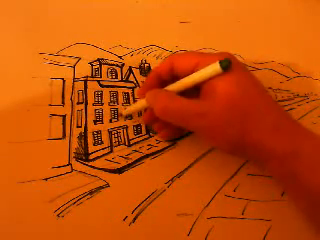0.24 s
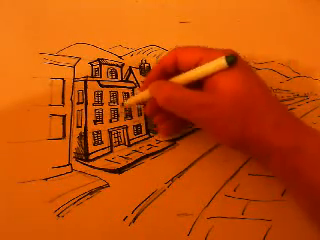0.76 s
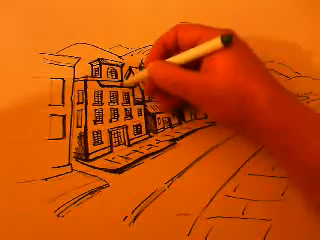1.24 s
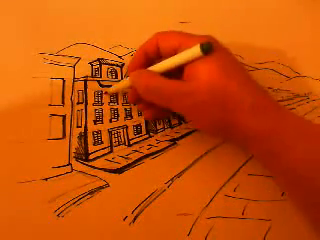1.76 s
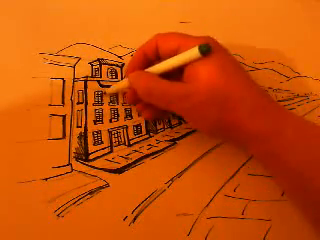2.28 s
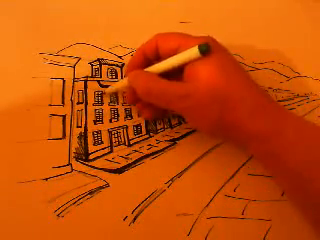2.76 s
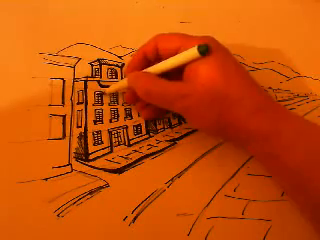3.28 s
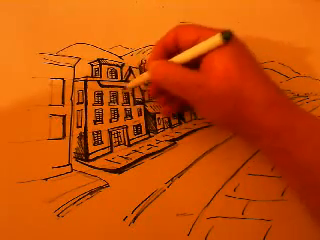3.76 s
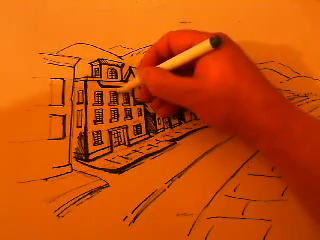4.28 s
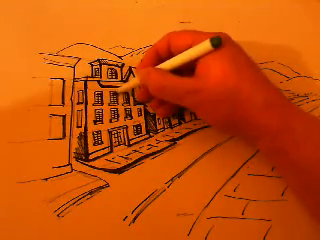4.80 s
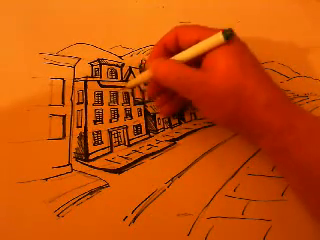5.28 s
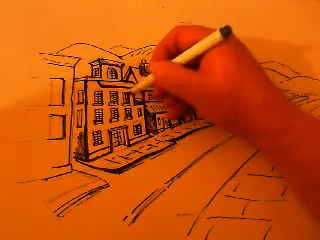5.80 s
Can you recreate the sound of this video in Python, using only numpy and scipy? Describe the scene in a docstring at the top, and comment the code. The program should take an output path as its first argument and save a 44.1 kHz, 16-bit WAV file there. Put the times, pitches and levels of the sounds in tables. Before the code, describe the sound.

A quiet small room, heard through a close microphone: steady soft air hiss, faint low fan hum wavering slightly, and a thin, very high electronic whine with rapid tiny interruptions. From 0.1 to 1.8 s a felt-tip pen skims paper in faint, airy strokes, with tiny high squeaks near 0.4, 0.6 and 0.85 s and a longer drag around 1 s. Clearer, brighter swishes come at 2.1, 2.45 and 2.7 s. From 3.05 to 3.6 s four firmer strokes land with rasp and dull desk thuds, followed by a light swish at 3.7 s. After a lull with one soft bump at 4.1 s, a quick run of short, scratchy dabs fills 4.4 to 5.25 s, including sharp, cracking taps at about 4.86 and 5.1 s. Background alone follows until two gently landed, juddering rasps at 5.83 and 5.92 s.

```python
"""A felt-tip pen hisses and rasps over paper on a desk in a small quiet room, with soft thuds and two sharp taps.
Light strokes are mostly friction noise; pressed ones also excite pen, sheet and desk resonances.
Stick-slip adds chirps and judder as narrow-band noise; impacts ring damped modes.
Behind: a faint fan (harmonics of its turning rate), air hiss (shaped noise), electronics (steady and gated sines)."""
import sys
import numpy as np
from scipy import signal
from scipy.fft import rfft, irfft
from scipy.io import wavfile
from scipy.ndimage import uniform_filter1d

SR = 44100
rng = np.random.default_rng(int(sys.argv[2]) if len(sys.argv) > 2 else 0)


def wav_out(sig):
    """Save sig, one row per channel (or a flat mono array), as 16-bit PCM at SR to the path in sys.argv[1]."""
    wavfile.write(sys.argv[1], SR, np.round(np.clip(np.atleast_2d(sig).T, -1, 1) * 32767).astype(np.int16))


N = 266364
T = np.arange(N) / SR

# desk resonances: (frequency [Hz], level [dB], t60 [s])
DESK_MODES = [(74.5, -53, 0.29), (152.4, -58, 0.23), (229, -54.5, .12), (258, -57.5, 0.11),
              (313, -64.5, 0.077), (390, -60, 0.051)]
# the tip lands and drags: (start [s], length [s], level [dB], landing force [dB], judder pitch [Hz], 0 = smooth)
PRESSED_STROKES = [ (3.049, .11, -75.5, -16, 1080), (3.239, 0.085, -72.5, -9.5, 0),
                   (3.374, .1, -69.5, -4, 0), (3.547, 0.075, -73, -7.5, 0),
                   (4.389, 0.065, -75.5, -16, 1120), (4.525, 0.072, -70.5, -6.5, 1110),
                   (4.704, 0.055, -73, -6.5, 0), (4.8574, .07, -69, .5, 0), (4.982, .065, -72.5, -7, 0),
                   (5.1026, 0.058, -71.5, 1, 0), (5.201, 0.048, -78.5, -7, 0),
                   (5.828, .07, -75, -10.5, 980), (5.924, .09, -70, -18, 1002)]


def from_db(db):
    """Decibels to gain."""
    return 10 ** (np.asarray(db) / 20)


def rms_one(x):
    """Scale to rms 1."""
    return x / np.sqrt(np.mean(x ** 2) + 1e-20)


def drift(knots_per_s):
    """Slow random curve, rms 1: straight lines between random knots."""
    knots = rng.standard_normal(int(N / SR * knots_per_s) + 2)
    return rms_one(np.interp(T * knots_per_s, np.arange(len(knots)), knots))


def coloured(x, spectrum):
    """Shape a steady sound's spectrum, interpolated over log frequency; rms 1."""
    hz, db = np.transpose(spectrum)
    bins_hz = np.maximum(np.fft.rfftfreq(N, 1 / SR), 1)
    gain_db = np.interp(np.log(bins_hz), np.log(hz), db)
    return rms_one(irfft(rfft(x) * from_db(gain_db), N))


def high_pass(x, hz):
    """Gentle first-order cut below hz."""
    return signal.sosfilt(signal.butter(1, hz, "high", fs=SR, output="sos"), x)


def resonate(x, hz, width_hz):
    """Two-pole resonance with about unit gain at its peak."""
    r = np.exp(-np.pi * width_hz / SR)
    zeros = np.array([1, 0, -1]) * (1 - r * r) / 2
    poles = [1, -2 * r * np.cos(2 * np.pi * hz / SR), r * r]
    return signal.lfilter(zeros, poles, x)


def ring(clicks, hz, t60_s):
    """Damped mode: a unit click starts a decaying sine of initial height about 1."""
    r = np.exp(-np.log(1000) / (t60_s * SR))
    w = 2 * np.pi * hz / SR
    return signal.lfilter([0, np.sin(w)], [1, -2 * r * np.cos(w), r * r], clicks + 1e-18)


def swell(start_s, end_s, power):
    """Gain over one movement as the tip speeds up and slows down; low power = flatter top."""
    shape = np.hanning(65) ** (power / 2)
    return np.interp(T, np.linspace(start_s, end_s, 65), shape, 0, 0)


def air(level_db=-67.5):
    """Steady broadband hiss, strongest in the bass."""
    # room air and microphone hiss: (frequency [Hz], density [dB per Hz, relative])
    floor = [(10, 18.5), (35, 17), (65, 17), (100, 11), (260, 9), (400, 5), (700, 2), (1100, 1.5),
             (2000, -2.5), (4000, -4), (9000, -5.5), (12500, -4), (15500, -2)]
    return from_db(level_db) * coloured(rng.standard_normal(N), floor)


def electronics(whine_hz=13500.3, whine_db=-69.5, frames_per_s=15, blank_share=0.11):
    """Steady tones, and a high whine that pauses briefly in every frame."""
    # steady tones: (frequency [Hz], level [dB rms])
    tones = [(3892, -96), (8000, -88), (8107, -97)]
    gate = 1. * (T * frames_per_s % 1 > blank_share)
    reading = uniform_filter1d(gate, size=16)  # soft edges
    whine = from_db(whine_db) * reading * np.sin(2 * np.pi * whine_hz * T)
    steady = sum(from_db(db) * np.sin(2 * np.pi * hz * T) for hz, db in tones)
    return np.sqrt(2) * (whine + steady)  # rms to peak


def fan(turns_per_s=30.52, wobble=.001, flutter_db=2.0):
    """Multiples of a slightly unsteady turning rate, each wavering in level."""
    # hum: (multiple of turning rate, level [dB rms before flutter])
    orders = [(4, -84.5), (5, -80.5), (6, -84.5), (7, -84), (8, -87.5), (10, -81), (14, -92), (28, -95.5)]
    turns = turns_per_s * np.cumsum(1 + wobble * drift(3)) / SR
    out = np.zeros(N)
    for k, db in orders:
        phase = 2 * np.pi * (round(k) * turns + rng.random())
        out += from_db(db + flutter_db * drift(5)) * np.sin(phase)
    return np.sqrt(2) * out  # rms to peak


def contacts(landing_hz=6100, hardening=3.02, thud_hz=260):
    """Contact pushes: the tip's brighten with force; the hand's stay dull."""
    # hand bumps the desk between strokes: (time [s], level [dB])
    thuds = [(3.127, -6.5), (3.480, -4.5), (4.131, -10), (4.627, -3.5)]
    # landing_hz is the corner of a 0 dB landing; it rises as force ** hardening
    blows = [(s, db, landing_hz * from_db(db) ** hardening) for s, _, _, db, _ in PRESSED_STROKES]
    blows += [(s, db, thud_hz) for s, db in thuds]
    out = np.zeros(N)
    for s, db, corner_hz in blows:
        decay = np.exp(-2 * np.pi * corner_hz / SR)
        push = from_db(db) * (1 - decay) * decay ** np.arange(512)
        out[round(s * SR):][:len(push)] += push
    return out


def landings(spot_db=1.5, crack_db=-41, crack_low_hz=1500, crack_high_hz=9000):
    """Soft contacts mainly thud the desk; hard ones also crack and ring the pen's high modes."""
    # struck pen and sheet: (frequency [Hz], level [dB], t60 [s])
    pen_modes = [(915, -49.5, 0.009), (1216, -47.5, 0.013), (1840, -54, 0.0092), (2950, -51.5, 0.0055),
                 (5270, -50, 0.0047), (6900, -47, 0.0041)]
    contact = contacts()
    # each spot on the sheet drives the desk modes a little differently
    desk = sum(ring(contact * from_db(db + spot_db * drift(10)), hz, t60_s)
               for hz, db, t60_s in DESK_MODES)
    pen = sum((-1) ** k * ring(contact * from_db(db), hz, t60_s)
              for k, (hz, db, t60_s) in enumerate(pen_modes))
    low_pass = signal.butter(2, crack_high_hz, fs=SR, output="sos")
    crack = signal.sosfilt(low_pass, high_pass(contact, crack_low_hz))
    return desk + pen + from_db(crack_db) * crack


def stick_slip(hz, width_hz):
    """Uneven squeak: noise through two equal resonances in series; rms 1."""
    slips = rng.standard_normal(N)
    return rms_one(resonate(resonate(slips, hz, width_hz), hz, width_hz))


def chirps(hz=5250, width_hz=450, half_s=0.0096):
    """Brief high stick-slip squeaks as the tip turns a corner."""
    # chirps: (time [s], level [dB])
    corners = [(0.408, -74), (0.635, -76), (0.845, -70.5)]
    return stick_slip(hz, width_hz) * sum(from_db(db) * swell(s - half_s, s + half_s, power=2.4)
                                          for s, db in corners)


def judders(width_hz=380, level_db=-1, fade_db=-5.5):
    """Lower stick-slip tone under pressure, dying down by fade_db over the stroke."""
    out = np.zeros(N)
    for start_s, length_s, db, _, hz in PRESSED_STROKES:
        if hz:
            fade = fade_db * np.clip((T - start_s) / length_s - .5, -.5, .5)
            gain = from_db(db + level_db + fade) * swell(start_s, start_s + length_s, power=0.25)
            out += gain * stick_slip(hz, width_hz)
    return out


def friction(snags_per_s, size_db, patchy_db):
    """Fibres snag and let go at random, in patches that follow the paper's tooth."""
    spread_db = size_db * np.minimum(rng.exponential(1, N), 4)
    sizes = from_db(spread_db) * rng.standard_normal(N)
    snags = rng.random(N) < snags_per_s / SR
    return sizes * snags * from_db(patchy_db * drift(150))


def light_strokes(dull, bright, rasp, even_s=.15, flick_tilt_db=3, rasp_db=-13.5):
    """The tip skims the paper; a short flick is brighter than a long line."""
    # skims: (start [s], length [s], hiss level [dB])
    skims = [ (0.073, .115, -75), (0.312, .055, -76.5), (0.52, .05, -79.5), (0.712, .07, -75.5),
             (0.968, 0.24, -74.5), (1.568, .125, -73.5), (1.647, .135, -76.5), (2.12, 0.11, -66.5),
             (2.441, 0.095, -65), (2.55, 0.059, -76.5), (2.682, 0.1, -69.5), (3.427, 0.054, -82),
             (3.657, 0.14, -69.5)]
    out = np.zeros(N)
    for start_s, length_s, db in skims:
        # dull falls and bright rises by flick_tilt_db per halving of even_s
        tilt_db = flick_tilt_db * np.log2(even_s / length_s)
        skim = from_db(-tilt_db) * dull + from_db(tilt_db) * bright + from_db(rasp_db) * rasp
        out += from_db(db) * swell(start_s, start_s + length_s, power=1.23) * skim
    return out


def pressed_strokes(dull, bright, rasp, rumble, hiss_db=-3.5, tilt_db=-0.5, hiss_lag_s=0.0059,
                    judder_rasp_db=-4, rumble_db=-1):
    """Hiss follows the tip's speed and lags; rasp and desk rumble last as long as the tip presses."""
    hiss = from_db(-tilt_db) * dull + from_db(tilt_db) * bright
    out = np.zeros(N)
    for start_s, length_s, db, _, judder_hz in PRESSED_STROKES:
        moving_s = start_s + hiss_lag_s
        out += from_db(db + hiss_db) * swell(moving_s, moving_s + length_s, power=1.0) * hiss
        # judder turns part of the rasp into one tone
        body = from_db(judder_rasp_db if judder_hz else 0) * rasp + from_db(rumble_db) * rumble
        out += from_db(db) * swell(start_s, start_s + length_s, power=0.27) * body
    return out


def strokes(split_hz=7200):
    """One friction force is heard as hiss, as rasp via pen and sheet, and as rumble via the desk."""
    # felt on paper fibres: (frequency [Hz], density [dB per Hz, relative])
    fibres = [(1500, -31), (2400, -17.5), (3100, -8.5), (3900, -16), (5000, -7), (6200, -2), (7200, -6.5),
              (8100, -5), (9300, -12), (10300, -9.5), (11300, -20), (15000, -26)]
    # rubbed pen and sheet: (frequency [Hz], width [Hz], level [dB, relative])
    rasp_modes = [(233, 170, -2), (446, 177, 0), (970, 400, -0.5), (1157, 470, 0.5), (1805, 390, -6.5),
                  (3060, 210, -10.5)]
    force = friction(snags_per_s=20000, size_db=1.5, patchy_db=2.2)
    hiss = coloured(force, fibres)
    dull = signal.sosfiltfilt(signal.butter(2, split_hz, fs=SR, output="sos"), hiss)
    bright = hiss - dull
    rasp = rms_one(sum((-1) ** k * from_db(db) * resonate(force, hz, width_hz)
                       for k, (hz, width_hz, db) in enumerate(rasp_modes)))
    rumble = rms_one(sum(ring(force * from_db(db), hz, t60_s) for hz, db, t60_s in DESK_MODES))
    return light_strokes(dull, bright, rasp) + pressed_strokes(dull, bright, rasp, rumble)


def room(x, echo_s=.0064, echo_db=-3.5, echo_low_hz=3020, tail_db=-3, t60_s=0.21, tail_low_hz=450):
    """One bright near reflection, and a short diffuse tail with little bass."""
    t = T[:SR // 2]
    tail = rng.standard_normal(len(t)) * np.exp(-np.log(1000) * t / t60_s)
    tail *= np.minimum(t / echo_s, 1)  # builds up until the reflection arrives
    tail *= from_db(tail_db) / np.sqrt(np.sum(tail ** 2))
    echo = from_db(echo_db) * np.pad(high_pass(x, echo_low_hz), (round(echo_s * SR), 0))[:N]
    return x + echo + signal.fftconvolve(high_pass(x, tail_low_hz), tail)[:N]


def scene():
    """The pen in the room, over air, electronics and fan."""
    background = air() + electronics() + fan()
    pen = landings() + chirps() + judders() + strokes()
    return (background + room(pen))[None]


def record(dry, offset=-.0047, cutoff_hz=15800):
    """The converter sits slightly off zero; a steep low-pass cuts the top."""
    low_pass = signal.ellip(10, .05, 60, cutoff_hz, fs=SR, output="sos")
    return signal.sosfiltfilt(low_pass, dry + offset)


dry = scene()
out = record(dry)
wav_out(out)
```